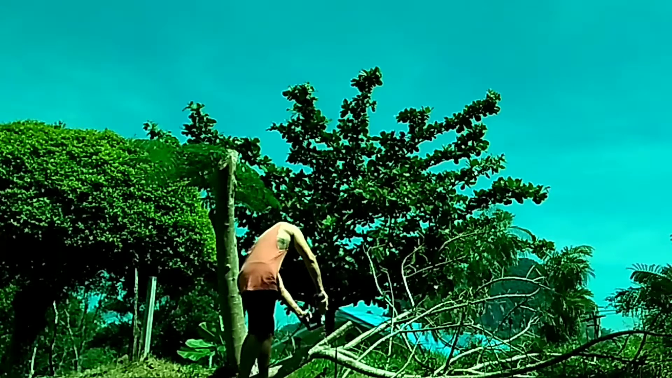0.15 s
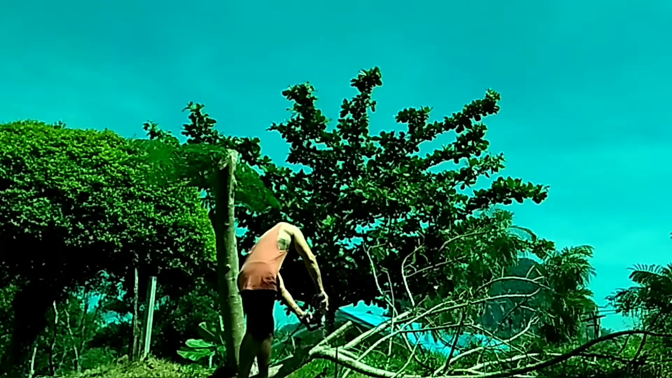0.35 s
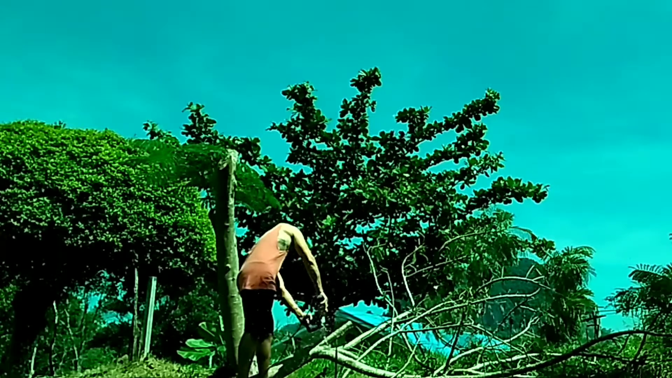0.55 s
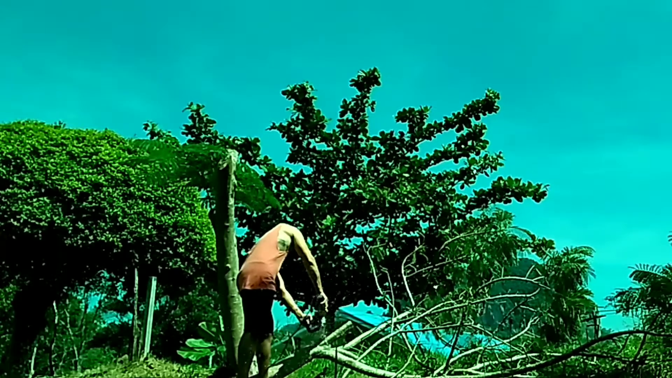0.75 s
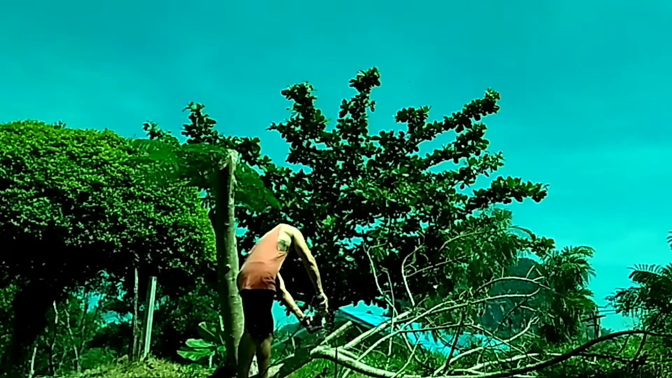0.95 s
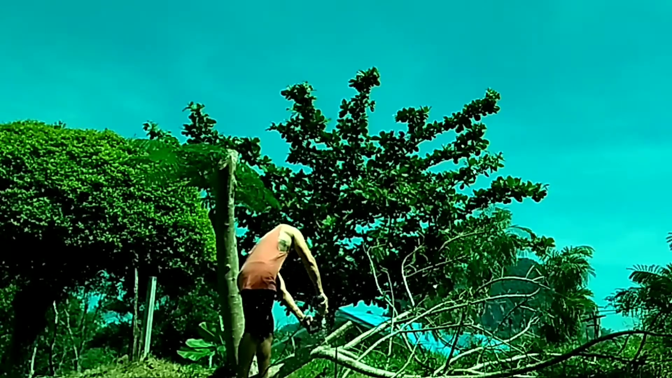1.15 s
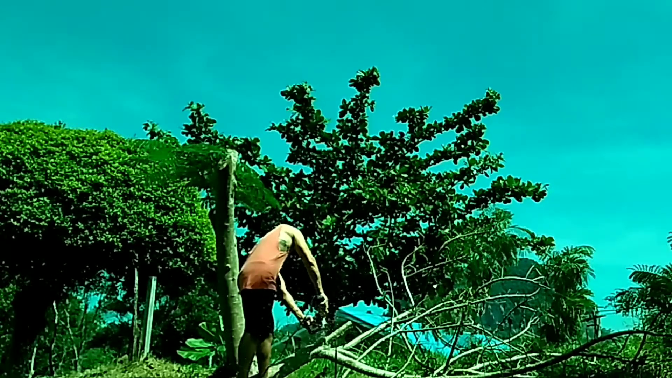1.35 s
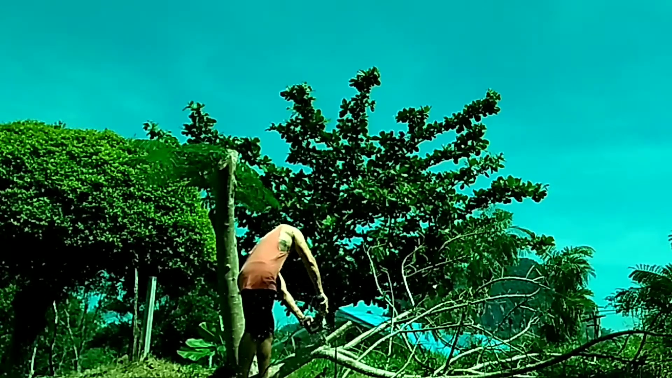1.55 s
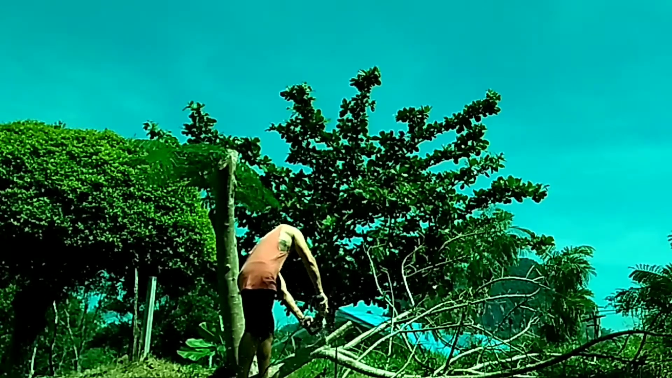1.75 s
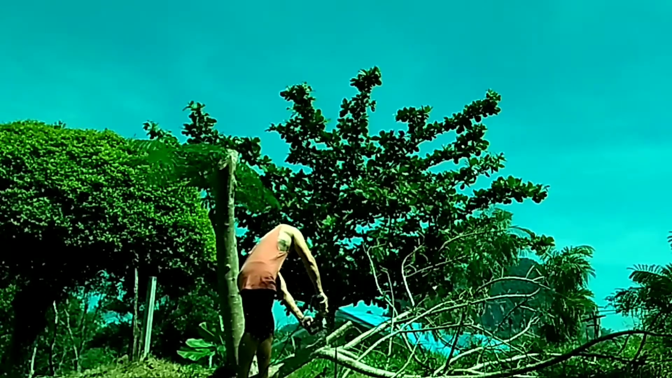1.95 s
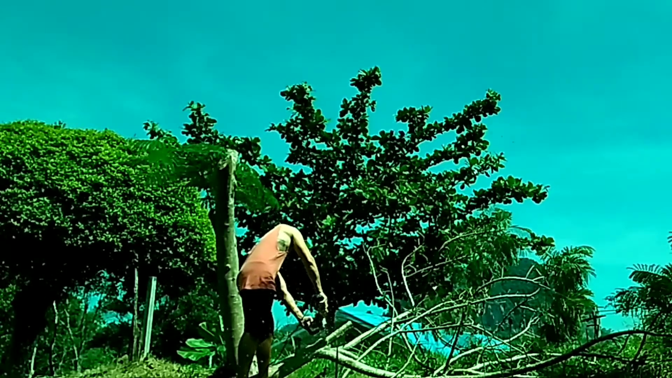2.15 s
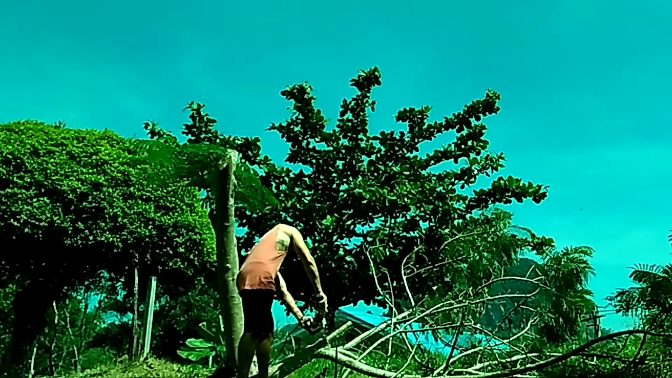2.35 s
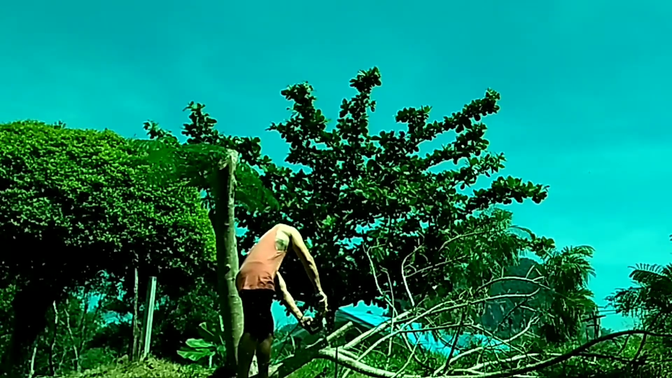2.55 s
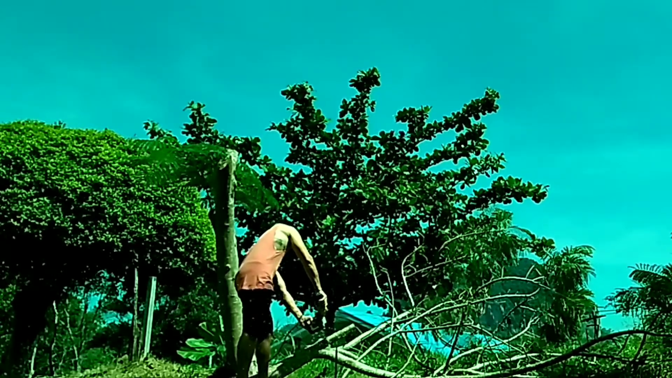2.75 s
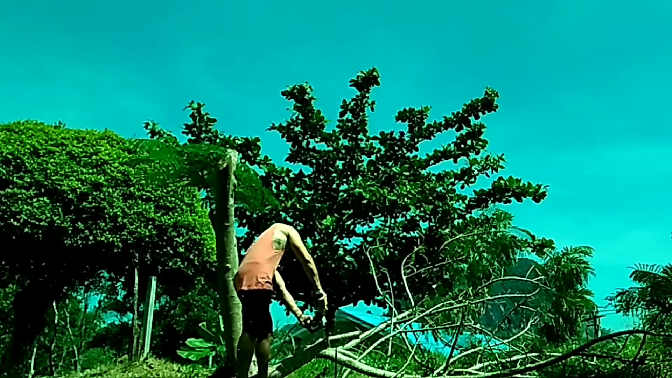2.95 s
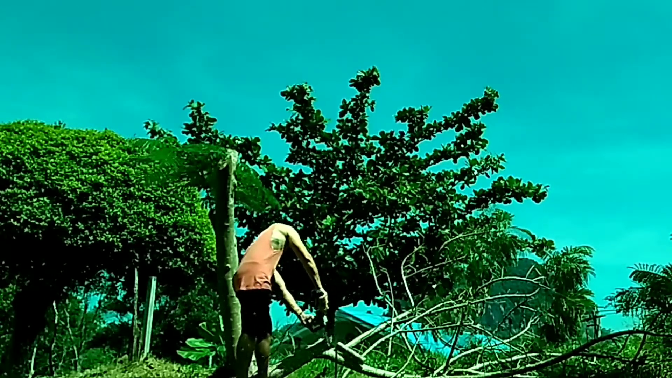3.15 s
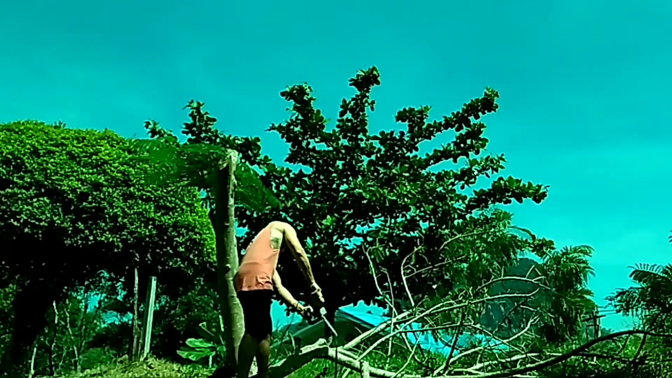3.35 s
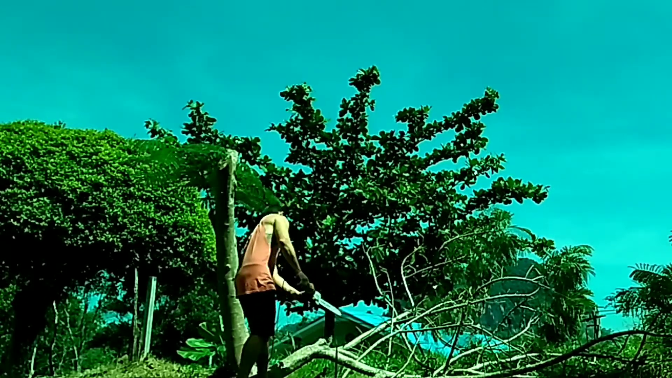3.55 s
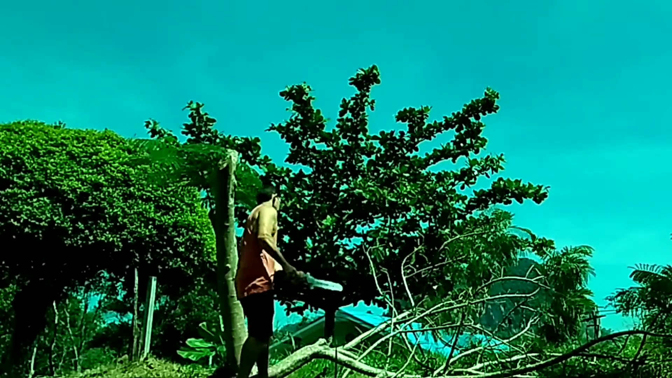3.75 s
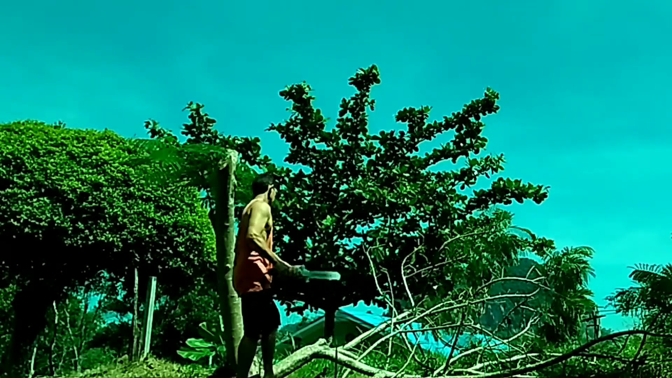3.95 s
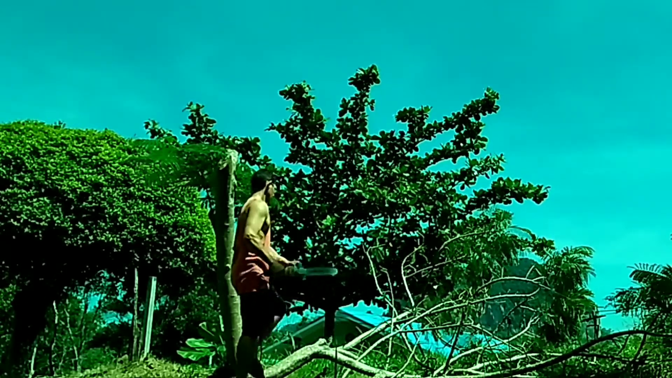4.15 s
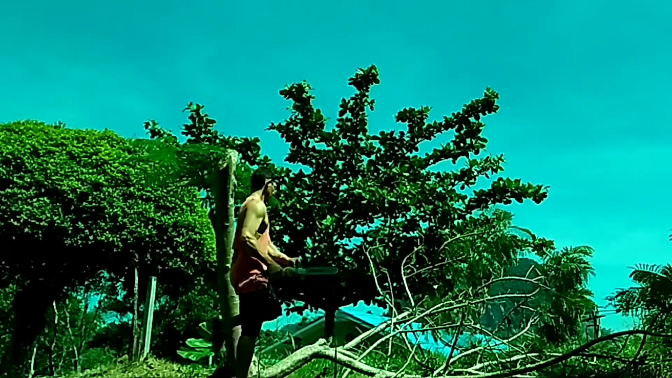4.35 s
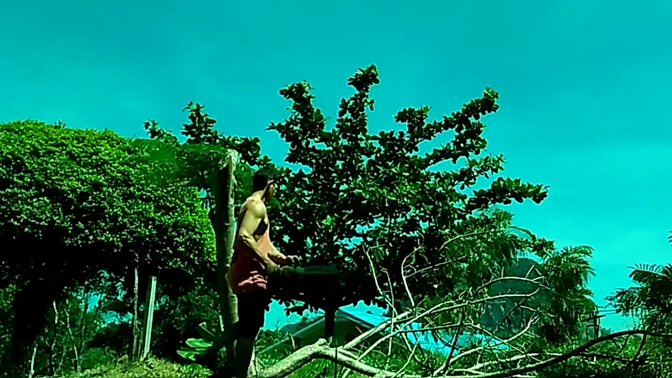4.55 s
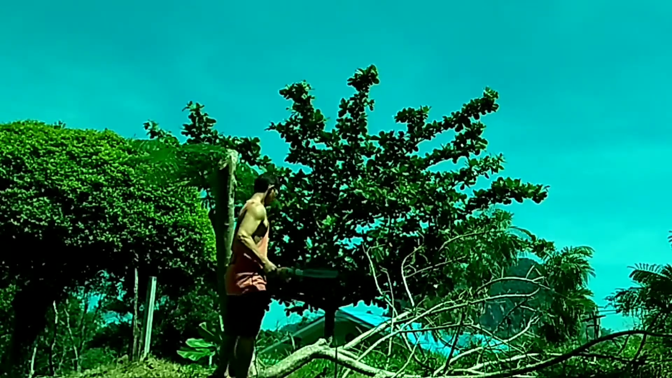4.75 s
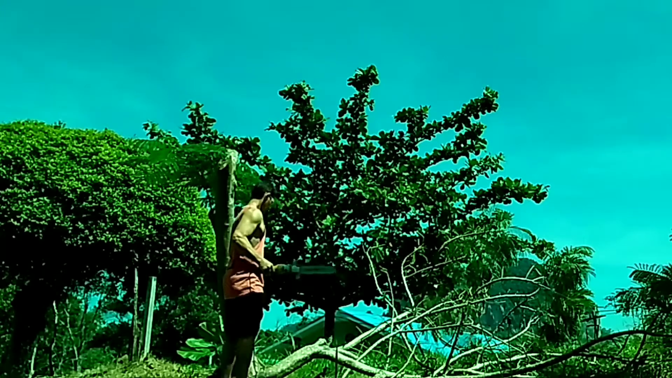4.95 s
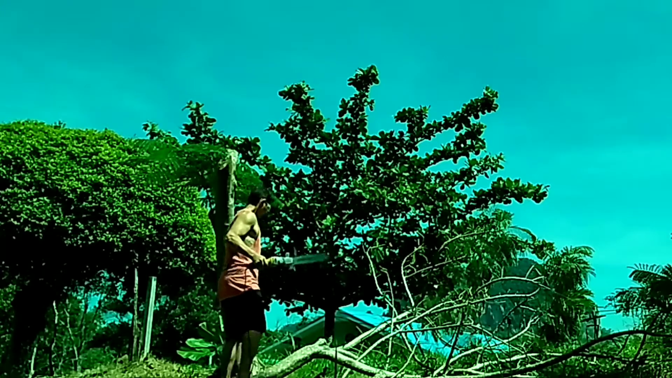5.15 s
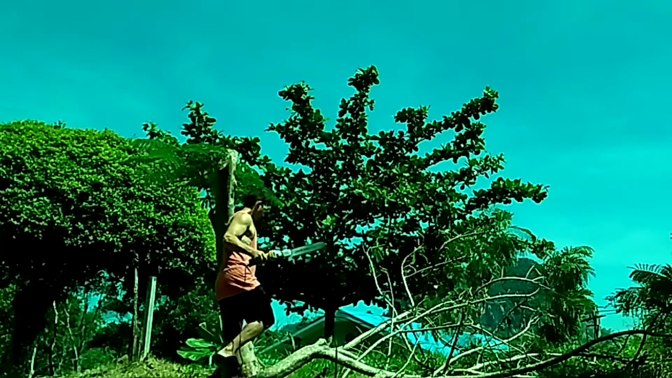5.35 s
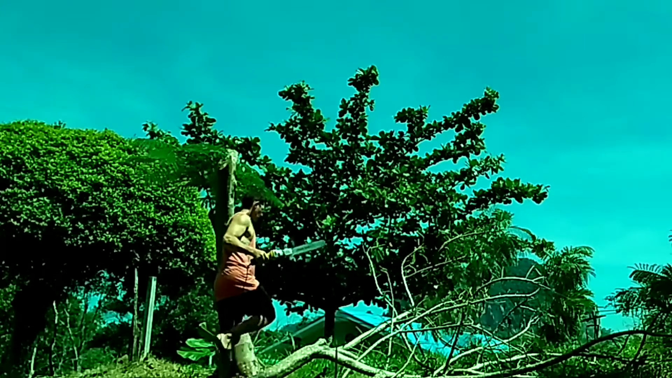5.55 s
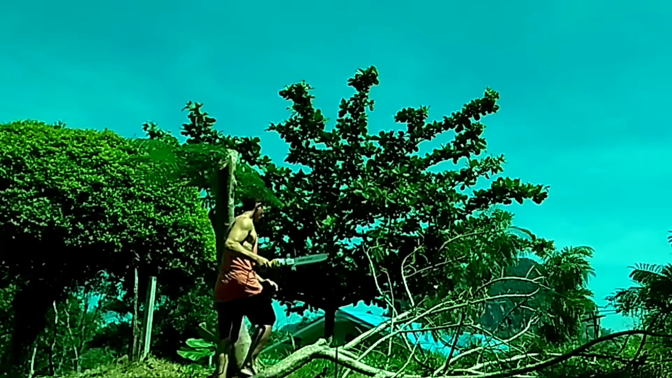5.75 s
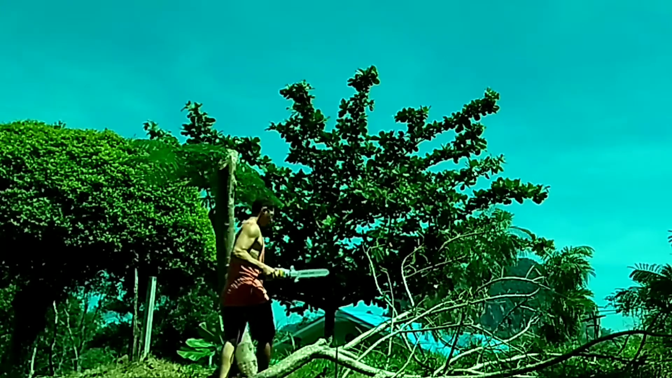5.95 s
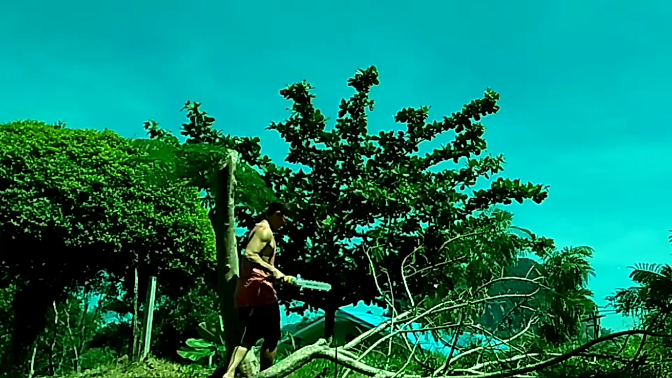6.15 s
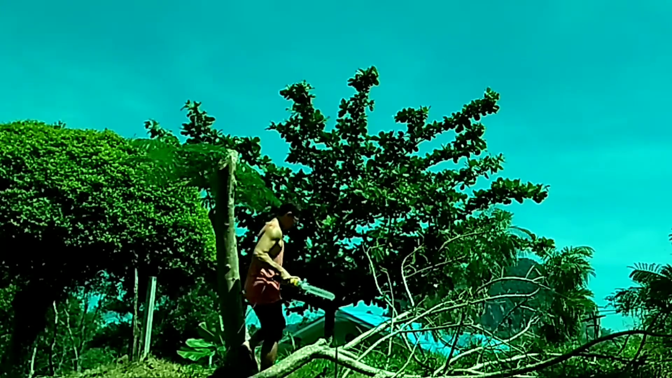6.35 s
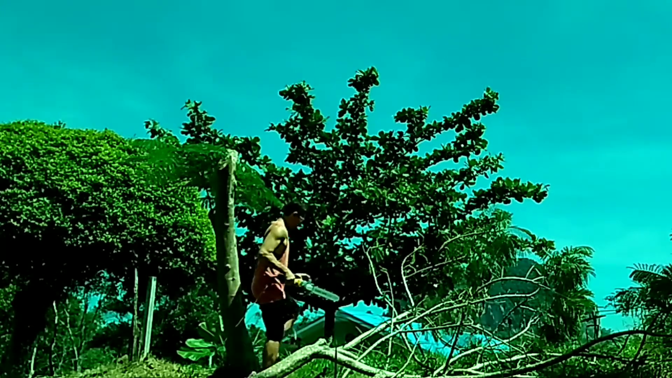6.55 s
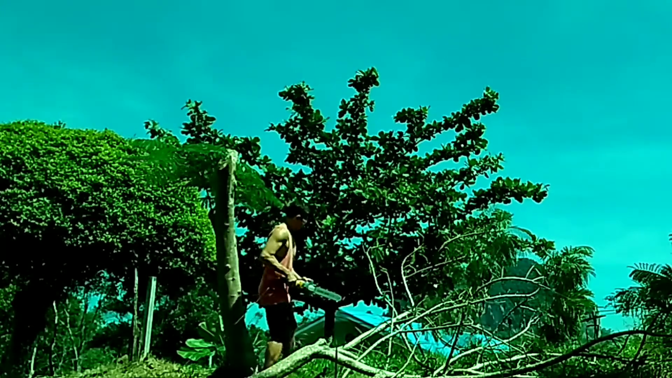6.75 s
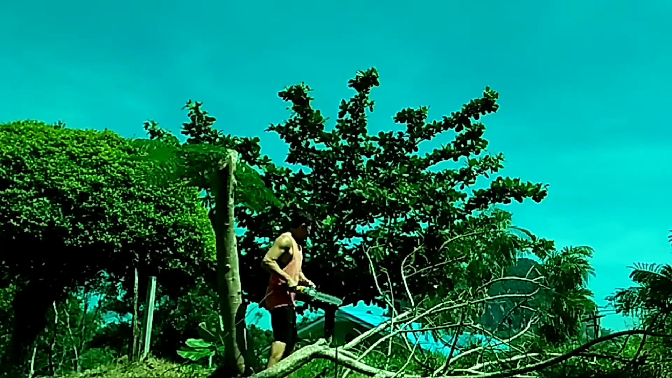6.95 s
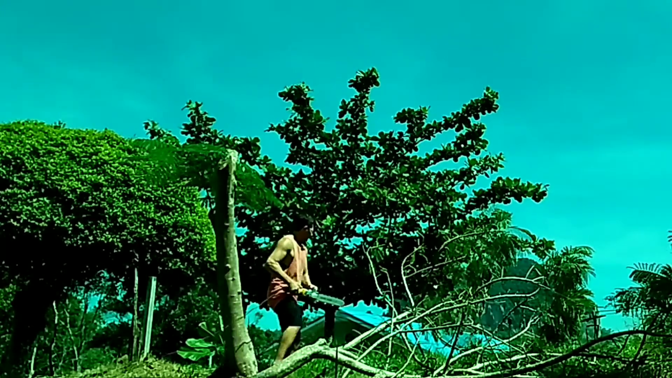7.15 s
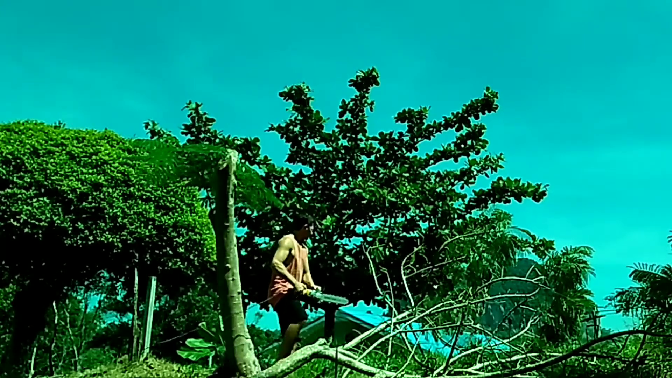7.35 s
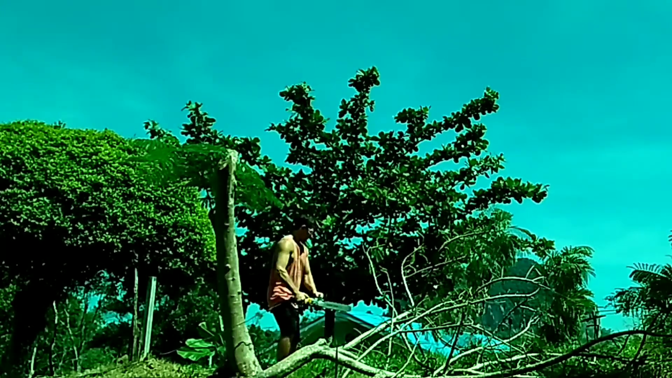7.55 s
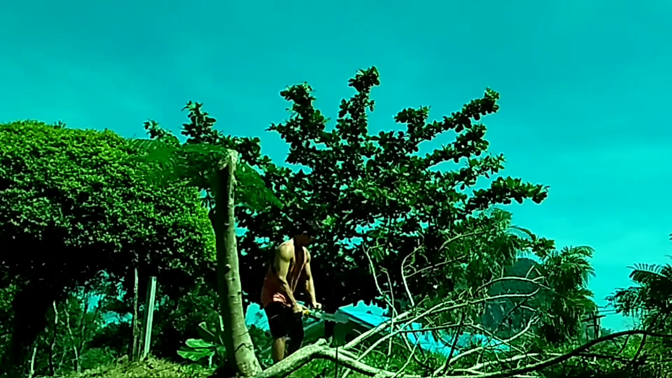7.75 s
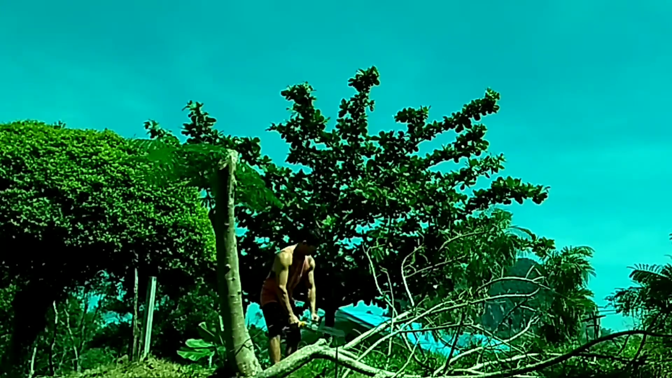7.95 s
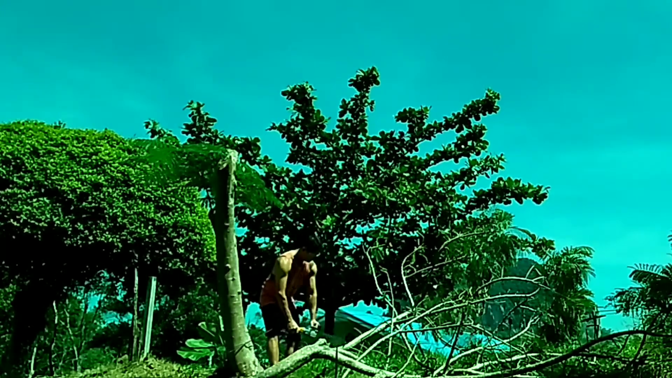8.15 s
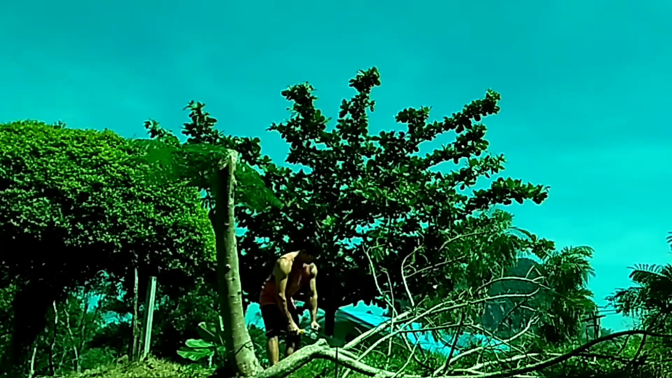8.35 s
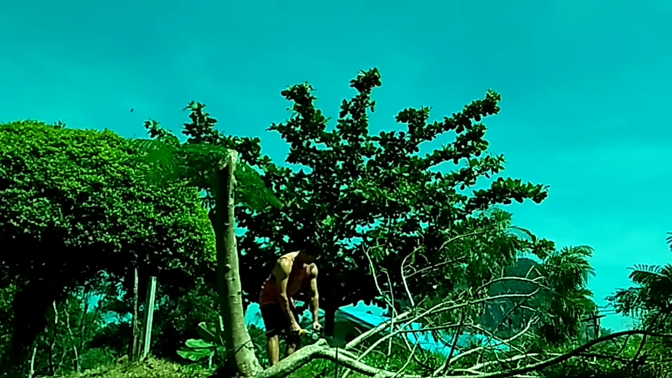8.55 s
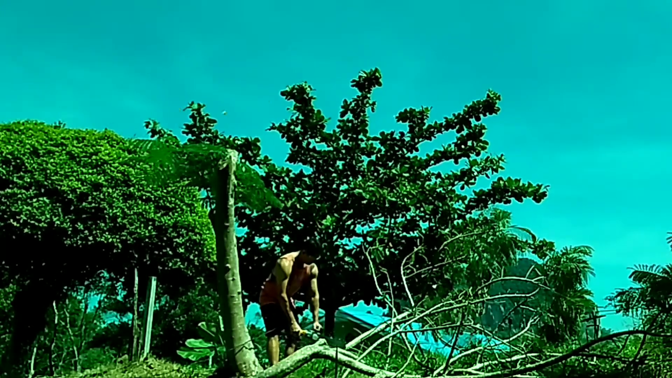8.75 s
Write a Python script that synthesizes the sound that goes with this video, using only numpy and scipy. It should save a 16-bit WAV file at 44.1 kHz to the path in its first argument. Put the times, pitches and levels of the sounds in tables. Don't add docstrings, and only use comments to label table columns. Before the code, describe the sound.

Harsh whining, clattering electric chain cutter sags in wood, rises, winds down to quiet footsteps and twig snaps, then spins up to cut again.

```python
import sys
import numpy as np
from scipy import signal
from scipy.io import wavfile
from scipy.ndimage import uniform_filter1d

SR = 44100
rng = np.random.default_rng(int(sys.argv[2]) if len(sys.argv) > 2 else 0)


def voltage_ratio(level):
    return 10 ** (np.asarray(level, float) / 20)


def unload_audio(sound):
    columns = np.transpose(np.atleast_2d(sound))
    steps = np.round(np.clip(columns, -1, 1) * 32767)
    wavfile.write(sys.argv[1], SR, steps.astype(np.int16))


N = 388521
T = np.arange(N) / SR
HZ = np.fft.rfftfreq(1024, 1 / SR)
FRAMES = np.arange(N // 256 + 2) * 256 / SR

# pitch_hz, level_db (per Hz)
GARDEN_COLOUR = [(18, -40), (30, -10), (182, 1.5), (274, -11), (476, -9.5), (660, -14), (778, -11),
                 (1470, -17), (2080, -25.5), (3000, -41), (4000, -50.5), (5200, -83.5), (8800, -120)]
# start_s, lift_db
WASH_SWELL = [(0, 6), (1.3, 3), (2.5, 2.5), (4.5, -2), (6, -1.5), (8.81, -2.5)]
# start_s, pitch_hz
DRONE = [(0, 49.1), (.3, 52.2), (1.7, 55.7), (3.5, 60.4), (4.3, 57), (4.6, 53.55), (5.8, 65), (6.3, 62.8),
         (6.45, 47.9), (8.81, 49.4)]
# middle_s, length_s, level_db
SWELLS = [(.17, .17, -57), (.82, 0.23, -52), (1.17, .25, -53), (1.75, .27, -47), (2.35, 0.47, -56),
          (3.03, .25, -47), (3.55, .2, -48), (3.92, .18, -57), (4.37, .12, -61), (6.65, .25, -62),
          (8.12, .12, -62), (8.7, .3, -61)]
# pitch_hz, level_db
HUM = [(86.1, -62), (172.3, -62.5)]

# peak_s, hold_s, level_db, fade_s (for 30 dB), treble_db
RUSTLE = [
    (6.56, 0.06, -61, .05, -10),
    (6.64, 0.16, -80, .5, 14),
    (6.89, 0.1, -73, .1, 12),
    (7.04, .07, -59.5, .15, 7),
    (7.28, 0.0073, -63, 0, 8),
    (7.33, .02, -74, .15, 11),
    (7.51, 0.123, -63, 1, 7),
]
RUSTLE_RISE_S = [.02, .1, .2, .2, .015, .05, .09]
# start_s, peak_db, pitch_hz, width_hz, rattle_t60_s
SNAPS = [(3.129, -28, 380, 350, 0.034), (4.899, -39, 220, 200, .06), (6.56, -33.5, 2290, 800, 0.012),
         (6.5805, -48, 3500, 2500, .012), (6.889, -52, 2500, 600, .03), (7.0215, -45, 4500, 7000, .01),
         (7.032, -42, 7500, 3000, .012), (7.0415, -40, 900, 1200, .015), (7.0605, -42, 900, 1400, .03),
         (7.081, -43, 1500, 2500, .015), (7.274, -28, 9000, 14000, 0.0043),
         (7.2935, -32.5, 7600, 5000, 0.03), (7.515, -46, 2500, 1500, .03)]

# peak_s, hold_s, level_db,
# fade_s (for 30 dB), pitch_hz
CREEP = [
    (6.05, .04, -49, 0.44, 13300),
    (6.2, .12, -56, 0.15, 13400),
    (6.4, .03, -59.5, 0.15, 12200),
    (7.297, .01, -57, .15, 7000),
    (7.415, .04, -60, .1, 7300),
    (7.46, .14, -69, .1, 7200),
]
CREEP_RISE_S = [.2, .2, 0.036, 0.046, .015, .02]

# start_s, shaft_hz
FIRST_CUT = [
    (0.0, 499.5),
    (0.2, 484),
    (0.48, 412),
    (0.8, 370),
    (1.2, 351.3),
    (1.7, 362.2),
    (2.9, 433.4),
    (3.45, 487),
    (3.87, 499),
]
# start_s, shaft_hz
SECOND_CUT = [
    (7.63, 11),
    (7.74, 310),
    (7.9, 394),
    (8.06, 447),
    (8.2, 465),
    (8.38, 476),
    (8.6, 464),
    (8.81, 440),
]
# start_s, end_s
BITES = [
    (.43, 3.25),
    (8.6, 9),
]
# start_s, pose (0 first cut, 1 lifted out, 2 carried, 3 second cut)
POSE = [
    (0, 0),
    (3.55, 0),
    (4.15, 1),
    (4.4, 1),
    (4.95, 2),
    (7, 2),
    (7.5, 3),
    (8.81, 3),
]
# pitch_hz, level_db (per Hz)
COLOURS = [
    [(150, -47), (250, -22), (650, -11.5), (1000, -11.5), (1500, -7.5), (2200, -3.5), (2700, -3.5),
     (4800, -10.5), (7000, -5), (10200, -7), (12300, -7), (14200, -5.5), (15700, -3.5)],
    [(320, -23.5), (550, -15), (791, -8), (1050, -6), (2140, -3.5), (3540, -3), (4490, -9.5), (8430, -2.5),
     (12000, -8.5), (15600, -7)],
    [(180, -47), (300, -12.5), (418, -16), (518, -9.5), (939, -9), (1070, -12.5), (1570, -2), (4740, -11),
     (7920, -4.5), (11000, -10), (15600, -11)],
    [(320, -25), (550, -13), (873, -8.5), (1050, -8.5), (2200, -3), (2420, -1), (4880, -10), (8190, -3.5),
     (9970, -7), (15600, -8.5)],
]
# pitch_hz, width_hz, lift_db
RINGS = [
    [(810, 35, 4.5), (1015, 104, 9), (1300, 110, 7), (1640, 68, 3.5), (1970, 190, 6), (2363, 230, 5),
     (3590, 170, 3), (4310, 69, 4), (4990, 40, 6.5), (7000, 330, -2), (7860, 270, 2.5), (9460, 300, 4.5),
     (11070, 700, 7)],
    [(806, 66, 4.5), (1500, 220, 1), (2059, 120, 3), (2610, 230, 3.5), (3300, 250, -1), (8350, 450, 3.5),
     (9500, 400, 4), (14100, 300, 1.5)],
    [(959, 82, 5), (1430, 170, 2), (2000, 150, 1), (2640, 350, 4.5), (3500, 320, 3), (6540, 490, 3.5),
     (7860, 310, 5.5), (9680, 330, 0), (12800, 250, 3)],
    [(840, 130, 4.5), (1960, 120, 3.5), (2370, 63, 1.5), (2860, 100, 1), (3500, 250, 3), (6040, 150, 4.5),
     (7740, 200, 3.5), (8500, 320, 3), (10700, 310, 2.5), (12700, 280, -4)],
]
# start_s, level_db, brightness_db (as the bar turns)
CLATTER = [(0, -26, 4), (.2, -24, 2.5), (.6, -25.5, 2), (1.3, -26, 1.5), (2.35, -25, 1), (2.62, -25.5, 4.5),
           (2.9, -23.5, 1.5), (3.3, -25, 2), (3.75, -24, 3), (4.25, -27.5, 1.5), (4.76, -32, 1),
           (5.45, -39.5, 2), (5.96, -44, 0.5), (6.6, -49, 2.5), (7.7, -27.5, -1), (8.4, -25, 0),
           (8.81, -25.5, 0)]
# multiple (of the tooth rate), level_db
SPROCKET = [(1, -8.5), (2, -.5), (3, 0), (4, -11.5)]
# shaft_hz, level_db
UNBALANCE = [(10, -70), (230, -34), (335, -14), (368, -6.5), (410, 0), (500, 0)]
UNBALANCE_DB = [-40.5, -39, -42, -36.5]
# middle_s, length_s, sprocket_lift_db, pinion_lift_db, unbalance_lift_db
CATCHES = [(.25, .35, -2.5, 3, -6.5), (.55, .13, -4, 7, 0), (.72, .11, 9, 4, 0), (.97, .08, -8, -8, 0),
           (1.25, .06, 2, 5.5, 5), (1.88, .07, -2, 6, -2.5), (2.3, .12, 3.5, 5, 1),
           (2.56, .08, 7.5, -4, -2), (2.85, 0.11, -12, 6, -3), (3.1, .1, -5, 1, -2), (3.82, .13, 6, 0, 3),
           (4.15, .05, 5, 0, 3), (7.95, .06, 12, 7, 1.5), (8.15, 0.073, 3, 0, 3.5), (8.7, 0.081, 0, 0, 6.5)]

OFF_S, ON_S = 3.87, 7.626
SPINDLE, PINION = 9 / 32, 9


def evened(x):
    return x / np.sqrt(np.mean(x ** 2) + 1e-20)


def curves(rows, t):
    s, *columns = np.transpose(rows)
    return [np.interp(t, s, c) for c in columns]


def read(points):
    f, value = np.transpose(points)
    return np.interp(np.log(HZ + 1), np.log(f + 1), value)


def shape(x, db):
    z = signal.stft(x, nperseg=1024, noverlap=768)[2]
    z = z * voltage_ratio(db)[:, :z.shape[1]]
    return signal.istft(z, nperseg=1024, noverlap=768)[1][:N]


def above(hz, octaves):
    return 1 / (1 + np.exp(-np.log2((HZ + 1) / hz) / octaves))[:, None]


def wander(per_s):
    noise = uniform_filter1d(rng.standard_normal(N), size=64)
    return evened(signal.lfilter([1], [1, -np.exp(-2 * np.pi * per_s / SR)], noise))


def patches(bins, frames):
    field = rng.standard_normal((len(FRAMES), len(HZ))).T
    field = uniform_filter1d(field, size=bins, axis=0)
    return evened(uniform_filter1d(field, size=frames, axis=1))


def grains(per_s, spread_db):
    size = voltage_ratio(spread_db * np.minimum(rng.exponential(1, N), 4)) * rng.choice([-1, 1], N)
    hit = rng.random(N) < per_s / SR
    return size * hit / np.sqrt(per_s / SR) / voltage_ratio(1.75 * spread_db)


def bursts(rows, rises):
    s, hold, db, fade, value = np.transpose(rows)[..., None]
    rise_db = 33 * np.maximum((s - FRAMES) / np.array(rises)[:, None], 0)
    fade_db = 30 * np.maximum((FRAMES - s - hold) / fade, 0)
    power = voltage_ratio(db - rise_db - fade_db) ** 2
    total = power.sum(0) + 1e-30
    return 10 * np.log10(total + 1e-10), (power * value).sum(0) / total


def garden_wash():
    swell_db = curves(WASH_SWELL, FRAMES)[0] * (1 - above(230, .15))
    wash = evened(shape(rng.standard_normal(N), read(GARDEN_COLOUR)[:, None] + swell_db))
    return voltage_ratio(-53 + 0.9 * wander(4.4)) * wash


def far_engine():
    fired = np.cumsum(curves(DRONE, T)[0]) / SR
    level = voltage_ratio(-70.5 + 2.5 * wander(2))
    for s, length, db in SWELLS:
        level = level + voltage_ratio(db) * np.exp(-(2 * (T - s) / (1.56 * length)) ** 4)
    engine = np.sqrt(2) * level * np.cos(2 * np.pi * fired)
    octave = np.cos(2 * np.pi * 2 * fired + 0.73 * wander(2.7))
    return engine + voltage_ratio(-58 + 3.5 * wander(4.1)) * octave


def far_hum():
    out = np.zeros(N)
    for hz, db in HUM:
        line = np.cos(2 * np.pi * hz * T + 0.95 * wander(3.6))
        out += np.sqrt(2) * voltage_ratio(db + 2.2 * wander(3)) * line
    return out


def rustle():
    level_db, treble_db = bursts(RUSTLE, RUSTLE_RISE_S)
    colour_db = above(5800, .08) * (treble_db - 4.5) - 25 * (1 - above(500, .3))
    colour_db = colour_db - 8.1 * np.exp(-((HZ[:, None] - 4900) / 700) ** 2)
    blots_db = 2.4 * patches(bins=10, frames=10)
    return shape(grains(6000, 2.8), level_db + 7.0 + colour_db + blots_db)


def snaps():
    out, t = np.zeros(N + 4096), np.arange(4096) / SR
    for s, db, hz, width, t60 in SNAPS:
        r = np.exp(-np.pi * width / SR)
        ring = .25 * rng.standard_normal(len(t)) * voltage_ratio(-60 * t / t60) - (t == 0)
        ring = signal.lfilter([1, 0, -1], [1, -2 * r * np.cos(2 * np.pi * hz / SR), r * r], ring)
        ring = signal.lfilter([1], [1, -np.exp(-2 * np.pi * (hz + width) / SR)], ring)
        out[round(s * SR):][:len(t)] += voltage_ratio(db) * ring / abs(ring).max()
    return out[:N]


def creep():
    level_db, hz = bursts(CREEP, CREEP_RISE_S)
    band_db = -10 * np.log10(1 + ((HZ[:, None] - hz) / 900) ** 4)
    return shape(voltage_ratio(2.6 * wander(40)) * grains(5000, 2.5), level_db + band_db + 12.5)


def shaft():
    drag_s, seize_s, halt_s = 1.47, .8, 6.5
    first = uniform_filter1d(curves(FIRST_CUT, T)[0], size=6000, mode="nearest")
    second = uniform_filter1d(curves(SECOND_CUT, T)[0], size=2000, mode="nearest")
    coast = np.exp(-np.maximum(T - OFF_S, 0) / drag_s) * np.clip((halt_s - T) / seize_s, .1, 1)
    return np.where(T < ON_S, first * coast, second)


def in_wood():
    biting = sum((T > a) & (T < b) for a, b in BITES) * 1.
    return uniform_filter1d(biting, size=3000, mode="nearest")


def motor_load(speed):
    free_hz, sag_hz = 498, 150
    return in_wood() * np.clip((free_hz - speed) / sag_hz, 0, 1)


def clatter():
    level_db, bright_db = curves(CLATTER, T)
    stall_s, stall_db_per_s2, spin_up_s = 5.935, 82, .035
    stall_db = -stall_db_per_s2 * np.maximum(T - stall_s, 0) ** 2 * (T < ON_S)
    start_db = 30 * np.log10(1.005 - np.exp(-np.maximum(T - ON_S, 0) / spin_up_s)) * (T >= ON_S)
    return np.maximum(level_db + stall_db + start_db, -97), bright_db + 0.35 * np.maximum(stall_db, -40)


def pose_colour():
    pose, field = curves(POSE, FRAMES)[0], 0
    for k, (colour, rings) in enumerate(zip(COLOURS, RINGS)):
        db = read(colour) + sum(lift / (1 + (2 * (HZ - f) / w) ** 2) for f, w, lift in rings)
        db = db + 1.1 * rng.standard_normal(len(HZ))
        db = db - 10 * np.log10(np.sum(voltage_ratio(db[14:105]) ** 2) / len(HZ))
        field = field + db[:, None] * np.maximum(1 - abs(pose - k), 0)
    return field


def tones(turns, speed, load):
    sprocket_teeth, armature_slots = 6, 12
    level_db, bite = clatter()[0], in_wood()
    caught = sum(np.array(lift)[:, None] * np.exp(-((T - s) / length) ** 2) for s, length, *lift in CATCHES)
    sprocket_db = level_db - 29 + 13.5 * bite + caught[0]
    pinion_db = level_db - 28 + 14 * bite + caught[1]
    freed_db = 10 * np.exp(-((T - 3.4) / .15) ** 2)
    slot_db = level_db - 22 + 7.5 * load + freed_db
    pose_db = np.interp(curves(POSE, T)[0], np.arange(len(RINGS)), UNBALANCE_DB)
    unbalance_db = curves(UNBALANCE, speed)[0] + pose_db - 13 * load + caught[2]

    lines = [(k * sprocket_teeth * SPINDLE, sprocket_db + db) for k, db in SPROCKET]
    lines += [(PINION, pinion_db), (2 * PINION, pinion_db - 6.0), (armature_slots, slot_db)]
    out = voltage_ratio(unbalance_db + 2.25 * wander(15)) * np.cos(2 * np.pi * turns)
    for k, db in lines:
        waver_db = (3.3 if k < PINION else 1.6) * wander(12)
        out += voltage_ratio(db + waver_db - 2) * np.cos(2 * np.pi * k * turns + .5 * wander(25))
    return np.sqrt(2) * out


def chain_drive(speed, turns, load):
    mains_hz = 99.4
    powered = (T < OFF_S) | (T > ON_S)
    cutter = np.cos(np.pi * SPINDLE * turns + .9 * wander(2))
    beat_db = 0.93 * (.3 + .75 * load) * cutter + 0.39 * powered * np.cos(2 * np.pi * mains_hz * T)
    beat_db = beat_db + 0.35 * wander(24.8) + 0.49 * wander(250)
    buzz = np.diff(np.floor(mains_hz * T), prepend=0) * powered * np.sqrt(SR / mains_hz)
    buzz = signal.lfilter(*signal.butter(2, 2300, fs=SR), buzz)
    slow = 1 - speed / 520
    burst = rng.standard_normal(400) * voltage_ratio(-60 * T[:400] / .012)
    knocks = signal.oaconvolve(grains(90, 2.6), burst / np.linalg.norm(burst))[:N]
    links = grains(1500 + 25 * speed, 3.04)
    noise = 0.79 * rng.standard_normal(N) + 0.5 * links + 0.62 * slow * knocks
    return voltage_ratio(beat_db) * noise + 0.19 * buzz


def chain(speed, turns, load):
    drive = chain_drive(speed, turns, load)
    level_db, bright_db = clatter()
    treble_db = np.interp(FRAMES, T, bright_db)
    tilt_db = above(3700, 0.21) * (treble_db - 0.5)
    tilt_db = tilt_db + above(10100, .08) * (0.32 * treble_db - 1.6)
    mesh_hz = PINION * np.interp(FRAMES, T, speed)
    slack_db = 3 - 5.5 * np.interp(FRAMES, T, load)
    tilt_db += slack_db * np.exp(-(np.log((HZ[:, None] + 1) / mesh_hz) / 0.1) ** 2)
    patches_db = 2.2 * patches(bins=1, frames=26) + .5 * patches(bins=14, frames=10)
    return voltage_ratio(level_db) * shape(drive, pose_colour() + tilt_db + patches_db)


def scene():
    speed = shaft()
    turns, load = np.cumsum(speed) / SR, motor_load(speed)
    background = garden_wash() + far_engine() + far_hum()
    feet = rustle() + snaps()
    tool = creep() + tones(turns, speed, load) + chain(speed, turns, load)
    mono = background + feet + tool
    return np.array([mono, mono])


def band_limit(x):
    return signal.sosfilt(signal.butter(12, 16410, fs=SR, output="sos"), x)


def record(dry):
    z = signal.stft(dry[0], nperseg=1024, noverlap=768)[2]
    power = uniform_filter1d(uniform_filter1d(abs(z) ** 2, size=9, axis=0), size=5, axis=1)
    local_db = 10 * np.log10(power + 1e-18)
    sunk_db = -1.4 * np.clip(-94 - local_db, 0, 14) * above(2200, 0.14)
    mono = shape(dry[0], sunk_db - 90 * (HZ > 15780)[:, None])
    return band_limit(np.array([mono, mono]))


dry = scene()
out = record(dry)
unload_audio(out)
```